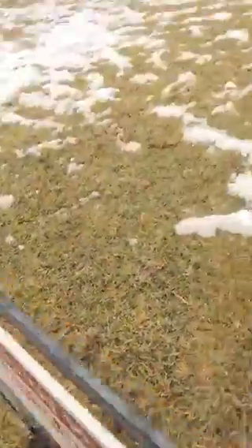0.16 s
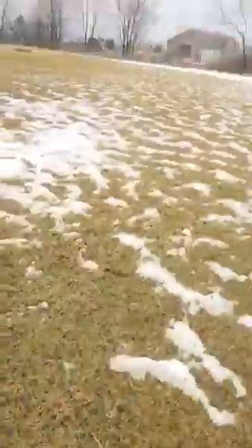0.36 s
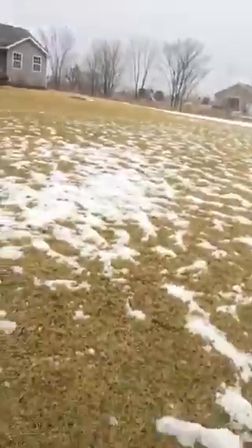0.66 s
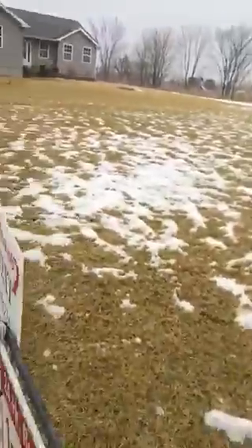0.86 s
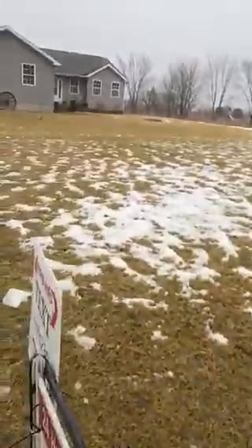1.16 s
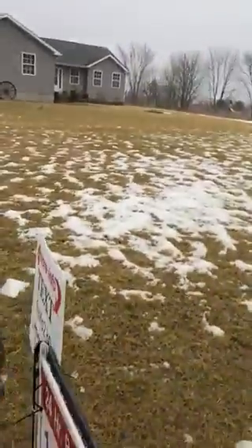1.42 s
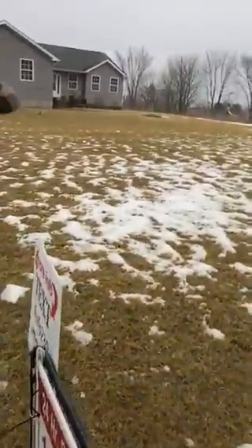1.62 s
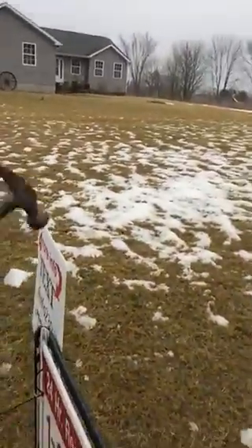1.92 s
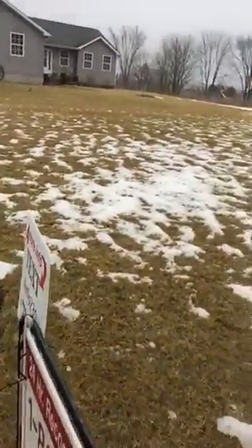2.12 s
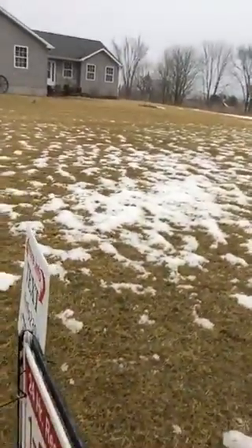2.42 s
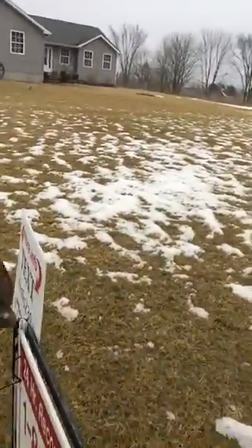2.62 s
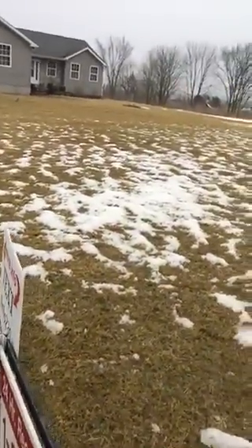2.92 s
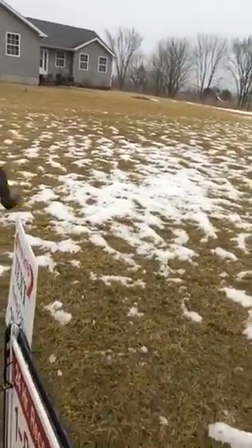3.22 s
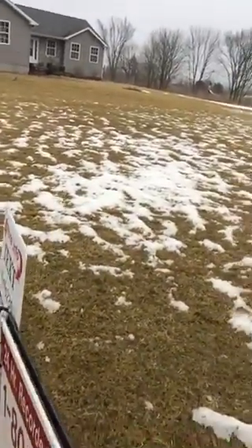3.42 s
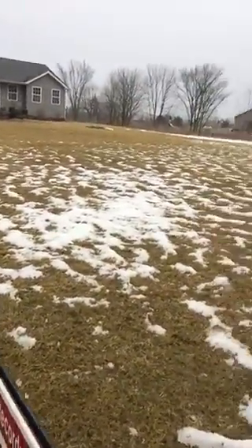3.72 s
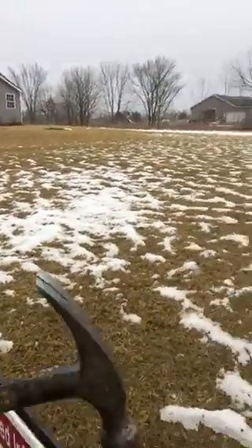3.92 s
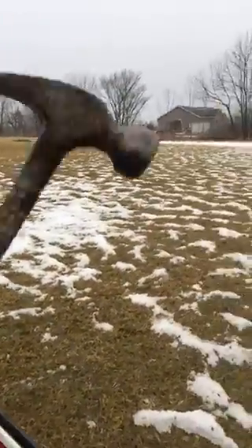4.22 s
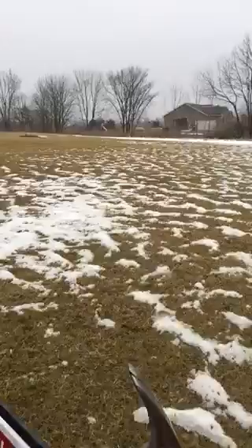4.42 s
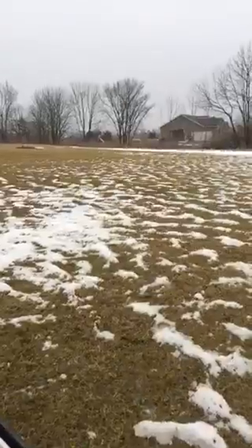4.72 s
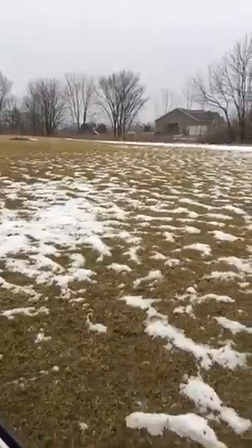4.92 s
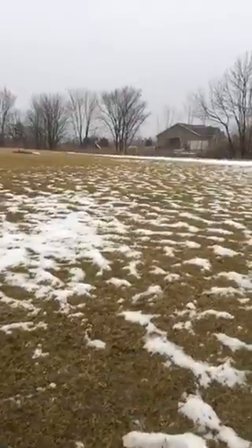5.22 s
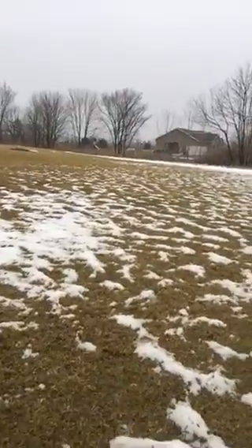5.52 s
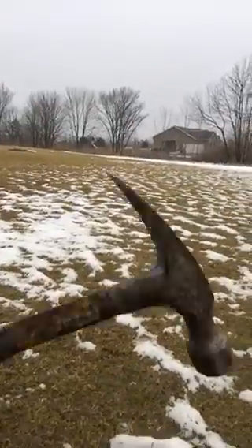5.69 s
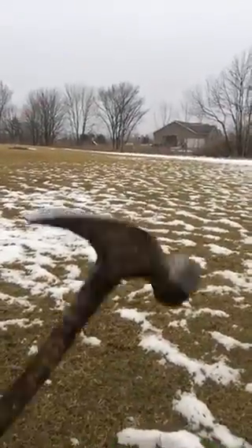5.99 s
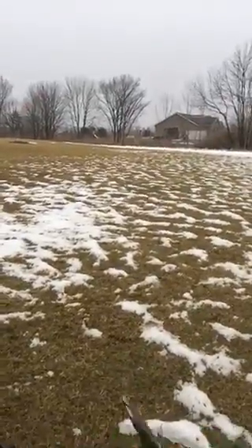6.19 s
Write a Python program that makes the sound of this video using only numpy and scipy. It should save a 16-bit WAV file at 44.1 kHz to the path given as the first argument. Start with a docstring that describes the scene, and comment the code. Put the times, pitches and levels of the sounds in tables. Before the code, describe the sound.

A steel hammer cracks on a metal frame about every 0.6 seconds, harsh and clipped, with panel chatter and slapback from distant walls.

```python
"""Hammer on a sign frame.

A steel hammer drives a metal sign frame into a lawn, close to a hand-held microphone that each blow overloads.
Damped modes ring in the frame, noise bands rattle in the panel, and a low sine and noise form the thud.
Delayed copies return from house walls, and a fading noise wash from the trees; filtered noise gives the wind.
Small ticks of the frame and the handling are short noise bursts with a hollow knock.
"""
import sys
import numpy as np
from scipy import signal
from scipy.fft import rfft, irfft, next_fast_len
from scipy.io import wavfile
from scipy.ndimage import map_coordinates

SR = 44100
rng = np.random.default_rng(int(sys.argv[2]) if len(sys.argv) > 2 else 0)


def wav_out(sig):
    """Save sig, one row per channel (or a flat mono array), as 16-bit PCM at SR to the path in sys.argv[1]."""
    wavfile.write(sys.argv[1], SR, np.round(np.clip(np.atleast_2d(sig).T, -1, 1) * 32767).astype(np.int16))


def magnitude_from_level(level_db):
    """Linear magnitude for a level in decibels (20 dB per decade)."""
    exponent = np.asarray(level_db, float) / 20
    return 10 ** exponent


N = 280035  # length in samples

# Blows: [t/s, relative strength/dB, head ring level/dB, thud level/dB, brightness/(dB per octave)]
HAMMER_BLOWS = [(0.763, 3, -55, -34.5, 1.9), (1.404, 4.5, -42.5, -26.5, 2.2), (2.064, 3, -49.5, -20, 2.5),
                (2.717, 1.5, -55.5, -27.5, 2.5), (3.368, 2, -52, -35.5, 3),
                (4.4001, 3.5, -32.5, -22.5, 3.5), (4.993, 3, -51, -26.5, 2), (5.5838, 3.5, -32, -18.5, 3.5),
                (6.170, 2, -26.5, -23, 3.5)]
# Nominal modes of frame and panel: [f/Hz, relative level/dB, T60/s]
FRAME_MODES = [(278, -24.5, 0.17), (664, -28, 0.13), (1096, -21.5, 0.12), (1277.5, -20, 0.11),
               (1726, -19.5, .08), (1923, -13, 0.071), (2242, -11.5, 0.091), (2340, -9, 0.055),
               (2388, -6, 0.04), (2550, -18, 0.046), (2750, -10.5, 0.0077), (2902, -5, 0.038),
               (3206, -16, 0.059), (3810, -13, 0.034), (4060, -8, .04), (4446, -10.5, 0.023),
               (4640, -6, 0.042), (4770, -19.5, 0.06), (5357, -10.5, 0.046), (5814, -16.5, 0.046),
               (6591, -2.5, 0.029), (7044, -12.5, 0.035)]
# Spectrum of the loose panel's chatter: [f/Hz, relative density/(dB per Hz)]
CLATTER_SPECTRUM = [(24, -40), (40, -8.5), (637, -22), (1280, -10), (1490, -12), (2060, -5), (2330, -0.5),
                    (2640, -4), (4680, -7), (7160, -13), (7910, -14.5), (12100, -15), (15500, -20.5)]
# Decay of the chatter before it is stretched for each layer: [f/Hz, T60/s]
CLATTER_DECAY = [(100, 0.2), (300, 0.15), (700, 0.15), (1800, .08), (5000, 0.062), (12000, 0.041)]
# Discrete wall reflections: [delay t/s, level/dB]
WALL_ECHOES = [(0.162, -66), (0.198, -57.5), (0.224, -52.5), (.233, -44), (0.239, -50.5), (0.257, -53.5),
               (.300, -60), (0.463, -66.5), (0.556, -68.5)]
# Frequency response shared by all the wall paths: [f/Hz, level/dB]
WALL_RESPONSE = [(100, -34), (700, -29), (1300, -10.5), (2200, -9.5), (4800, 2.5), (7000, -7), (8500, -4.5),
                 (12000, -21.5), (16000, -27)]
# Denser groups of reflectors: [delay t/s, relative level/dB, rise time constant/s, fall time constant/s]
DENSE_REFLECTORS = [(.03, -52.5, .005, 0.034), (0.165, -59, .012, 0.0071), (.239, -53, .025, .07),
                    (.562, -59, 0.01, .012)]
# Colour of the scattered return: [f/Hz, relative density/(dB per Hz)]
WASH_SPECTRUM = [(350, -51.5), (600, -20.5), (682, -21.5), (917, -32), (1070, -16), (1250, -12),
                 (1790, -6.5), (2260, -4.5), (3500, -7.5), (4240, -12), (4760, -5), (6240, -10),
                 (6830, -12.5), (8180, -21), (13000, -35)]
# Ticks: [t/s, relative middle level/dB, relative low level/dB, relative high level/dB, T60/s]
TICK_EVENTS = [(0.0114, -42, -72, -72, 0.014), (0.0246, -46, -67, -63, 0.016),
               (0.0526, -40, -43.5, -45.5, 0.027), (0.158, -46.5, -68, -74, 0.019),
               (0.2628, -46, -24, -56, 0.025), (0.4214, -73, -40, -82, 0.015),
               (0.497, -57, -68, -80, 0.027), (0.802, -33, -51.5, -26.5, 0.047),
               (0.817, -33.5, -41, -43, 0.1), (0.8391, -34, -31, -41.5, 0.015),
               (0.9792, -43, -53, -64, 0.042), (1.0404, -60, -70, -48, 0.02),
               (4.785, -39.5, -54, -52, 0.014), (5.6437, -32, -40, -39, 0.019),
               (6.2424, -43.5, -42.5, -49, 0.017)]
# Nominal modes of the hollow body under the ticks: [f/Hz, relative level/dB, T60/s]
KNOCK_MODES = [(430, -4, .025), (800, -8, .016), (1100, 0, .018), (1800, -7, .009), (2600, -12, .007)]
# Course of the wind: [t/s, strength level/dB]
WIND_STRENGTH = [(0, -49.5), (.2, -53), (.35, -57.5), (.5, -57), (1.05, -52), (1.25, -58), (1.55, -58),
                 (1.9, -60), (2.15, -67.5), (2.6, -65), (2.9, -65), (3.5, -68), (3.9, -63.5), (4.15, -58),
                 (4.55, -60), (4.8, -58.5), (5.15, -69), (6.35, -68.5)]
# Spectrum of the buffeting on the microphone: [f/Hz, relative density/(dB per Hz)]
BUFFET_SPECTRUM = [(12, -54.5), (20, -26.5), (38, -10.5), (53, -3), (70, 3), (102, -8), (135, -0.5),
                   (161, -6.5), (192, -7.5), (269, -14), (334, -30), (420, -28), (500, -34.5), (650, -59),
                   (1100, -120)]
# Spectrum of the far rush: [f/Hz, relative density/(dB per Hz)]
RUSH_SPECTRUM = [(180, -28), (300, -5), (700, -12), (1300, -13), (3000, -21), (6000, -37), (9000, -71)]
# Spectrum of the hiss: [f/Hz, relative density/(dB per Hz)]
HISS_SPECTRUM = [(1500, -28), (3000, -3), (6500, -4.5), (10500, -6), (13200, -6), (15200, -4),
                 (16000, -21.5)]

HEAD_HZ, HEAD_T60_S = 4890, 0.22  # the hammer head rings on one thin line
LEAD_S, LEAD_DB = 0.022, -34  # a faint fizz sets in just ahead of each blow
# The shivering panel slaps the frame again and again
SLAP_FROM_S, SLAP_TO_S, SLAP_T60_S, SLAP_DB = 0.015, 0.075, 0.011, 4
ECHO_DB = 6  # added to the blow's strength in what travels out to walls and trees
# Open ground and far trees
WASH_DB, WASH_FADE_DB_PER_S, WASH_START_S = -54.5, 18.5, 0.03
# The arm stirs air over the microphone before each blow
SWING_S, SWING_RISE_S, SWING_DB = 0.16, 0.036, 4.5
RUSH_DB, HISS_DB = -76.5, -88  # mean levels
RUSH_FOLLOWS, HISS_FOLLOWS = 0.76, 0.7  # shares of the wind's swings in dB


def hammer():
    """Impact excitation: each blow rings the frame anew; returns the near sound and what travels out."""
    near, away = np.zeros(N), np.zeros(N)
    t = np.arange(SR // 2) / SR
    for s, db, head_db, thud_db, slope_db in HAMMER_BLOWS:
        body = frame_body(t, slope_db)
        # The steel-on-steel contact is louder at first
        crack = 1 + magnitude_from_level(-0.5) * magnitude_from_level(-60 * t / 0.0083)
        shiver = magnitude_from_level(-18.5) * panel_buzz(t, slope_db)
        # A thin bright after-shiver
        sizzle = magnitude_from_level(-41.5) * clatter(len(t), slope_db + 4.5, lasting=4.5)
        struck = magnitude_from_level(db + 3) * (body * crack + shiver + sizzle)
        head = magnitude_from_level(head_db - 60 * t / HEAD_T60_S) * np.sin(2 * np.pi * HEAD_HZ * t)
        add(near, s, struck + head + ground_thud(t, thud_db))
        # From afar only the loud start stands out
        sharp = magnitude_from_level(-60 * t / 0.075)
        add(away, s, magnitude_from_level(db + ECHO_DB - 6) * body * sharp)
        add(near, s - LEAD_S, leading_fizz(t))
    return near, away


def frame_body(t, slope_db):
    """Modal ringing with rattle: loose contacts damp the ring unevenly and the panel chatters."""
    ring = ringing(FRAME_MODES, t, scatter_db=4, detune=0.01, slope_db=slope_db)
    ring = ring * uneven(len(t), 200, depth_db=6)
    # The panel slaps on and off the frame
    rattle = uneven(len(t), 250, depth_db=2) * clatter(len(t), slope_db, lasting=0.94)
    return magnitude_from_level(-5) * ring + magnitude_from_level(-3.5) * rattle


def panel_buzz(t, slope_db):
    """Repeated contact: the panel shivers on, with random slaps standing out of a brighter chatter."""
    gain = slaps(t, count=16) * uneven(len(t), 40, depth_db=2.5) * uneven(len(t), 300, depth_db=4)
    return gain * clatter(len(t), slope_db + 4, lasting=1.82)


def ground_thud(t, thud_db):
    """Low-frequency impulse response: the stake jolts the soil and the panel flexes."""
    jolt = np.sin(2 * np.pi * 62 * t) * magnitude_from_level(-60 * t / 0.055)
    noise = rng.standard_normal(len(t))
    flex = unit(filtered(noise, lambda hz: (hz > 90) / (1 + (hz / 400) ** 3)))
    flex = flex * magnitude_from_level(-60 * t / 0.13)
    return magnitude_from_level(thud_db) * jolt + magnitude_from_level(thud_db - 3.5) * flex


def leading_fizz(t):
    """Gated noise: a faint fizz that decays towards a floor and stops at the blow."""
    fizz = uneven(len(t), 60, depth_db=3) * clatter(len(t), 1.0, lasting=48) * (t < LEAD_S)
    return magnitude_from_level(LEAD_DB) * fizz * (0.59 + 0.2 * magnitude_from_level(-60 * t / 0.023))


def clatter(length, slope_db, lasting):
    """Frequency-dependent damping: loose chatter as noise in which each band dies at its own speed."""
    hz, t, z = signal.stft(rng.standard_normal(length), SR, nperseg=128)
    tilt_db = slope_db * np.log2((hz + 100) / 3000)
    steady = magnitude_from_level(along(CLATTER_SPECTRUM, hz) + tilt_db)[:, None]
    t60 = lasting * along(CLATTER_DECAY, hz)[:, None]
    dying = magnitude_from_level(-60 * t / t60)
    sound = signal.istft(z * steady * dying, SR, nperseg=128)[1][:length]
    return sound / np.sqrt(np.mean(steady ** 2))


def slaps(t, count):
    """Random impacts: a gain with short decaying spikes at random moments after a blow."""
    when, size = rng.uniform(size=(2, count, 1))
    since = t - SLAP_FROM_S - when * (SLAP_TO_S - SLAP_FROM_S)
    spikes = size * (since > 0) * magnitude_from_level(-60 * np.abs(since) / SLAP_T60_S)
    return 1 + magnitude_from_level(SLAP_DB) * np.sum(spikes, axis=0)


def ringing(modes, t, scatter_db, detune, slope_db):
    """Modal superposition: damped sines vary in strength, tuning and life with where the contact lands."""
    hz, db, t60 = np.transpose(modes)[..., None]
    strength, life, tuning, phase = rng.standard_normal((4, len(modes), 1))
    tilt_db = slope_db * np.log2(hz / 3000)
    decay_db = 60 * t / (t60 * np.exp(0.025 * life))
    level = db + scatter_db * strength + tilt_db - decay_db
    tuned_hz = hz * (1 + detune * tuning)
    return np.sum(magnitude_from_level(level) * np.sin(2 * np.pi * (tuned_hz * t + phase)), axis=0)


def walls(x):
    """Specular reflection: delayed copies from house walls, thinned and dulled by one response."""
    answer = np.zeros(SR)
    for s, db in WALL_ECHOES:
        add(answer, s, magnitude_from_level([db]))
    echoes = signal.fftconvolve(x, answer)[:N]
    return filtered(echoes, lambda hz: magnitude_from_level(along(WALL_RESPONSE, hz)))


def trees():
    """Diffuse scattering: countless weak reflections blur into a wash that swells and fades with delay."""
    out = np.zeros(N)
    t = np.arange(int(1.2 * SR)) / SR
    swell = magnitude_from_level(WASH_DB - WASH_FADE_DB_PER_S * t) * (t > WASH_START_S)
    for delay, level_db, rise, fall in DENSE_REFLECTORS:
        swell = swell + magnitude_from_level(level_db) * np.exp(np.minimum((t - delay) / rise, (delay - t) / fall))
    for s, db, _, _, slope_db in HAMMER_BLOWS:
        add(out, s, magnitude_from_level(db + ECHO_DB - 13.5) * swell * scattered_wash(t, slope_db))
    return out


def scattered_wash(t, slope_db):
    """Air absorption: noise coloured by the frame's modes loses its treble on the longer paths."""
    # Mode weights are drawn afresh for each blow
    rung = magnitude_from_level(rng.normal(0, 3, len(FRAME_MODES)))

    def colour(hz):
        tilt_db = 0.31 * slope_db * np.log2((hz + 100) / 3000)
        peaks = 1
        for weight, (centre, level_db, _) in zip(rung, FRAME_MODES):
            peaks = peaks + weight * magnitude_from_level(level_db + 7.5) / (1 + ((hz - centre) / 55) ** 2)
        return magnitude_from_level(along(WASH_SPECTRUM, hz) + tilt_db) * peaks

    wash = unit(filtered(rng.standard_normal(len(t)), colour))
    wash = wash * uneven(len(t), 300, depth_db=1)
    dull = filtered(wash, lambda hz: 1 / (1 + (hz / 3500) ** 4))
    return dull + (wash - dull) * magnitude_from_level(0.5 - 10 * t)


def ticks():
    """Brief contact excitation: dry ticks, each with its own share of hollow knock, middle and treble."""
    out = np.zeros(N)
    t = np.arange(SR // 20) / SR
    middle = signal.butter(4, (2000, 7000), "bandpass", fs=SR, output="sos")
    treble = signal.butter(4, (7000, 15000), "bandpass", fs=SR, output="sos")
    for s, db, low_db, high_db, t60 in TICK_EVENTS:
        burst = rng.standard_normal((2, len(t))) * magnitude_from_level(-60 * t / max(t60, 0.003))
        snap = magnitude_from_level(db + 0.5) * signal.sosfilt(middle, burst[0])
        snap = snap + magnitude_from_level(high_db + 0.5) * signal.sosfilt(treble, burst[1])
        onset = 1 - np.exp(-t / 0.00041)
        knock = onset * ringing(KNOCK_MODES, t, scatter_db=-2, detune=0.049, slope_db=1.5)
        add(out, s, snap + magnitude_from_level(low_db - 3.5) * knock)
    return out


def wind():
    """Turbulent noise: one strength drives buffeting, rush and hiss; arm swings add to the buffeting."""
    t = np.arange(N) / SR
    strength_db = np.interp(t, *np.transpose(WIND_STRENGTH))
    change_db = strength_db - strength_db.mean()
    swing = sum(np.clip((t - s + SWING_S) / SWING_RISE_S, 0, 1) * (t < s) for s, *_ in HAMMER_BLOWS)
    buffet_db = strength_db + SWING_DB * swing + 2.5 * wobble(9)
    rush_db = RUSH_DB + RUSH_FOLLOWS * change_db + 1.8 * wobble(6.3)
    hiss_db = HISS_DB + HISS_FOLLOWS * change_db
    buffet = magnitude_from_level(buffet_db) * shaped_noise(BUFFET_SPECTRUM)
    rush = magnitude_from_level(rush_db) * shaped_noise(RUSH_SPECTRUM)
    hiss = magnitude_from_level(hiss_db) * shaped_noise(HISS_SPECTRUM)
    return buffet + rush + hiss


def shaped_noise(spectrum):
    """Spectral shaping: white noise given a spectrum and scaled to rms 1."""
    return unit(filtered(rng.standard_normal(N), lambda hz: magnitude_from_level(along(spectrum, hz))))


def wobble(rate):
    """Slow random modulation: a smooth curve with rate knots a second."""
    return map_coordinates(rng.standard_normal(int(N * rate / SR) + 4), [np.arange(N) * rate / SR])


def uneven(length, step, depth_db):
    """Random amplitude modulation: a wandering gain with one knot every step samples."""
    knots = rng.standard_normal(length // step + 4)
    return magnitude_from_level(depth_db * map_coordinates(knots, [np.arange(length) / step]))


def unit(x):
    """Power normalisation: scale to rms 1."""
    return x / np.sqrt(np.mean(x ** 2) + 1e-20)


def along(points, hz):
    """Logarithmic interpolation: (f/Hz, value) points joined on a log frequency axis."""
    f, v = np.transpose(points)
    return np.interp(np.log(hz + 1), np.log(f + 1), v)


def filtered(x, gain):
    """Linear filtering: the spectrum of x times a gain that depends on frequency."""
    m = next_fast_len(len(x) + 8192)
    return irfft(rfft(x, m) * gain(np.fft.rfftfreq(m, 1 / SR)), m)[:len(x)]


def add(track, s, sound):
    """Superposition: mix a sound into the track at time s."""
    part = track[round(s * SR):][:len(sound)]
    part += sound[:len(part)]


def scene():
    """Superposition of near blows, their echoes, ticks and wind."""
    near, away = hammer()
    return (near + walls(away) + trees() + ticks() + wind())[None]


def low_pass(x):
    """Removes everything above the highest recorded frequency."""
    return signal.sosfilt(signal.butter(12, 16460, fs=SR, output="sos"), x)


def record(dry):
    """Saturation and band limiting: the input stage clips the blows, and the band ends steeply."""
    top, hardness = 0.66, 6  # ceiling amplitude; a higher hardness gives a sharper knee
    clipped = dry[0] / (1 + np.abs(dry[0] / top) ** hardness) ** (1 / hardness)
    # Above 15.3 kHz the level falls 1 dB every 32 Hz
    band = filtered(clipped, lambda hz: magnitude_from_level(-np.clip(hz - 15300, 0, None) / 32))
    return low_pass(band[None])


dry = scene()
out = record(dry)
wav_out(out)
```